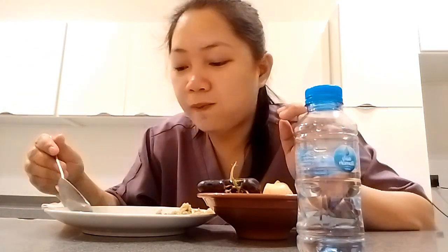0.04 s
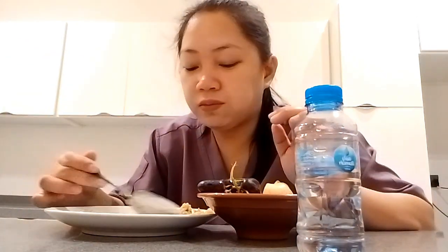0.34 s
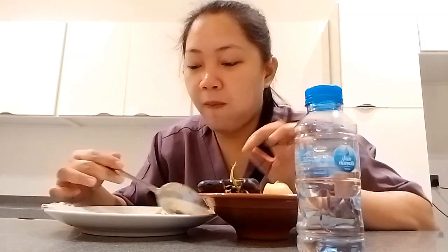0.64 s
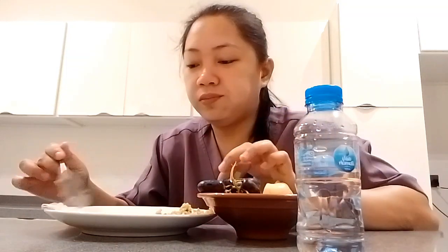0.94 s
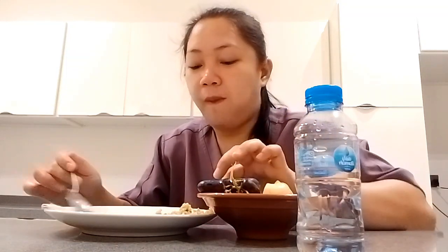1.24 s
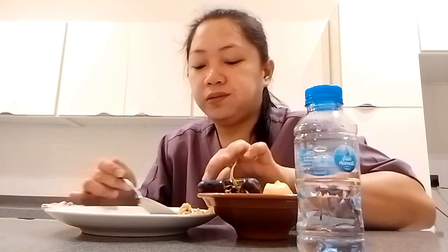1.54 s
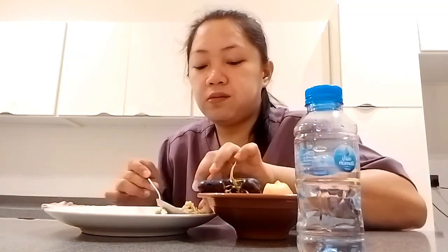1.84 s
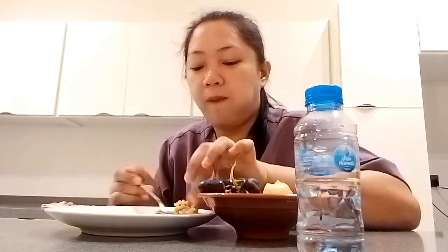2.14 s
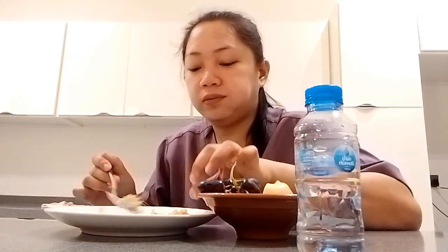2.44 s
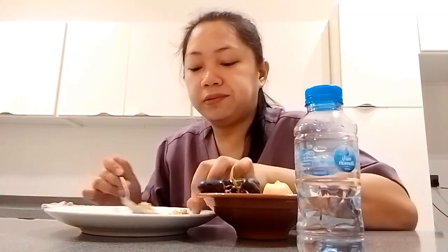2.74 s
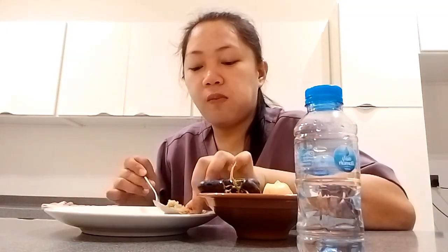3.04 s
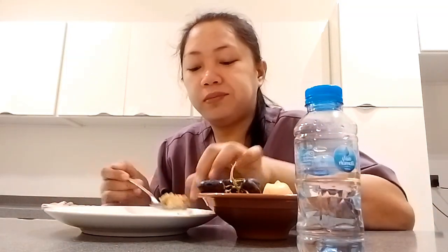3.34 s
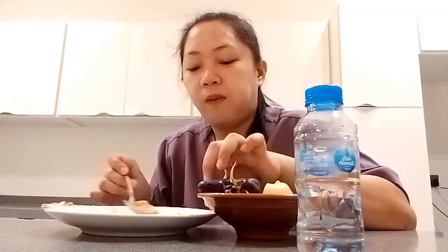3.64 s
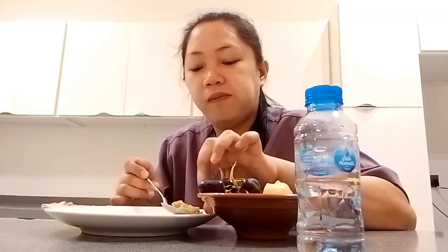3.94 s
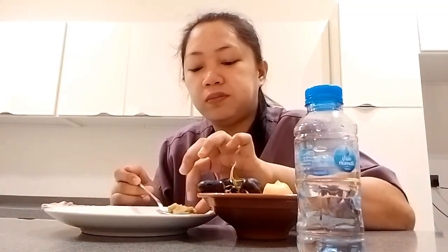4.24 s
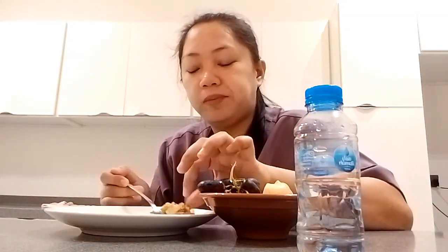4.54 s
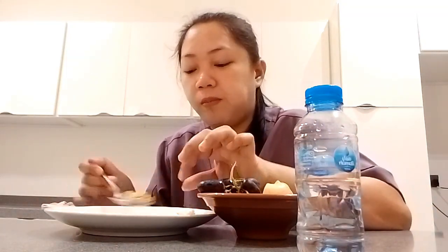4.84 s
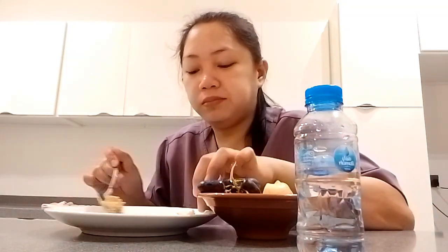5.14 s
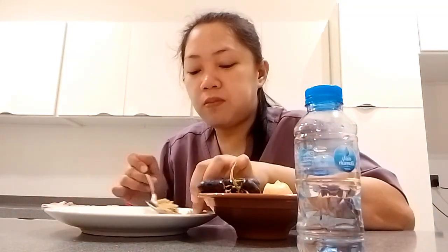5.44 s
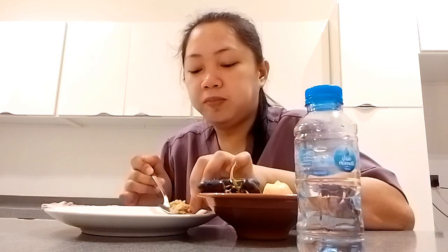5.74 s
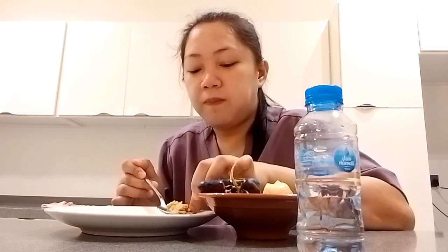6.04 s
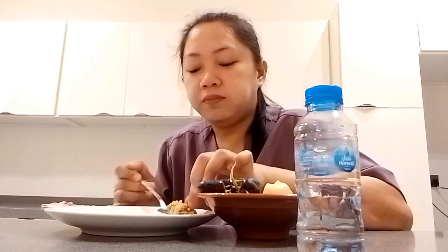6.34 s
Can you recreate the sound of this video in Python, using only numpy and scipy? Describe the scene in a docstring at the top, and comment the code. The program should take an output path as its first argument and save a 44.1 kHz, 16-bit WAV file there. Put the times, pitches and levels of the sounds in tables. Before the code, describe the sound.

A steel spoon clinks, scrapes and squeaks on a ceramic plate, scooping food in a small kitchen with humming appliances.

```python
"""A small kitchen, appliances humming, a phone on the counter as the microphone. Close to it, a steel
spoon clinks on a ceramic plate and drags food across in five scoops. The plate rings differently in
its well, on its slope and at its rim; the spoon's edge sticks and slips on the glaze, rasping and
squeaking, and the room answers. The phone's noise suppressor lets the room's rush up with each
stroke and closes again, the low bands last; once, between scoops, it shuts further on the low rush."""
import sys
import numpy as np
from scipy import signal
from scipy.fft import rfft, irfft, next_fast_len
from scipy.io import wavfile
from scipy.ndimage import uniform_filter1d, map_coordinates

SR = 44100
rng = np.random.default_rng(int(sys.argv[2]) if len(sys.argv) > 2 else 0)


def output_pcm(signal):
    """Save a mono or channel-first signal as 16-bit PCM at the path in sys.argv[1].

    Samples are clipped to [-1, 1] before scaling.
    """
    pcm = np.clip(np.atleast_2d(signal).T, -1, 1) * 32767
    wavfile.write(sys.argv[1], SR, np.round(pcm).astype(np.int16))


N = 290178

# appliance motors: (frequency [Hz], level [dB])
MOTOR_TONES = [(58.6, -69), (76.2, -66), (101.7, -58.5), (117.2, -44.5), (119.9, -63), (127.1, -51.5),
               (145.5, -52.5), (152.5, -56.5), (170.8, -66.5), (178, -60.5), (233.7, -61), (239.9, -60),
               (254.1, -63), (279.6, -68)]
# room tone, a rush of air: (frequency [Hz], relative level [dB])
AIR_SPECTRUM = [(20, -9.5), (45, -11.5), (85, -9), (125, -3), (210, 3.5), (300, 0.9), (385, -2.5),
                (480, -1.5), (620, -8), (850, -22), (1400, -19.5), (2100, -36), (4000, -43.5),
                (6000, -52.5), (8000, -54), (10000, -63), (16000, -66)]
# the plate's modes, by where the spoon touches:
# (frequency [Hz], t60 [s], level in the well [dB], level on the slope [dB], level at the rim [dB])
PLATE_MODES = [(490, .06, -8, -8, -25.5), (556, 0.045, 1.5, -13, -20.5), (831, .05, -4.5, 0.5, -15),
               (976, 0.013, -6.5, -14, -10), (1162, .06, -13.5, -1, -6.5), (1298, .04, -9, -8, -3.5),
               (1424, .03, -19.5, -19.5, 4.5), (1570, .035, -28.5, -31.5, -9),
               (1693, .035, -31.5, -33.5, -14), (2140, .04, -20, -11.5, -12.5),
               (2290, .018, -27, -24, -9.5), (2443, 0.069, -8.5, -22, -8.5), (2864, .02, -14.5, -26, -19.5),
               (3106, .035, -14.5, -14.5, -16.5), (3330, 0.075, -23, 5.5, -2),
               (3400, 0.041, -25, -19.5, 1.5), (3768, 0.081, 1.5, -31.5, -18),
               (3884, .03, -7.5, -27.5, -19.5), (4270, .04, -18.5, -30, -30),
               (4528, .025, -29, -26.5, -12.5), (4638, 0.03, -30, -20, -8), (5190, .03, -23, -24.5, -29),
               (5450, 0.08, -22, -24, -21.5), (5840, .04, -22.5, -32, -31.5), (6040, .05, -25, -31, -18),
               (6880, 0.0078, -23, -29, -29.5), (7526, 0.05, -27, -27, -23.5),
               (7780, .02, -22.5, -26, -33.5), (8120, 0.015, -20.5, -26, -34),
               (9250, .09, -50.5, -49, -38.5), (10000, .02, -36.5, -42, -60), (11140, .06, -36, -42.5, -38),
               (11600, .015, -36, -46.5, -61), (13080, .07, -42, -48, -40.5),
               (13700, .06, -31, -46.5, -39.5), (14600, .022, -26.5, -39, -63.5),
               (15230, .08, -31, -44, -37.5)]
# the spoon lands or catches; place is 0 in the well, 1 on the slope, 2 and up at the rim:
# (time [s], relative level [dB], place [0-2], low-mode boost [dB], relative steel tick [dB])
CONTACTS = [(0.178, -45.5, 0.84, 14.5, -37), (.293, -37.5, 0.33, 7, -18.5), (0.327, -32, 0.4, 14, -21.5),
            (.554, -27, 1.7, 9.5, -17.5), (.628, -31, 1.8, 7, -28), (.6495, -16, 2, 0.5, -46),
            (.652, -19, 2.5, -0.5, -45), (1.152, -33, 1, -4.5, -23), (1.226, -33, 0.99, 0, -25),
            (1.257, -31.5, 1.2, 12, -26), (1.283, -41.5, 0.02, -13, -9.5), (1.316, -40.5, 0.4, -11, -6.5),
            (1.404, -32.5, 0, -19, -21), (1.411, -26.5, 0.036, 0, -29), (1.493, -29, 0.019, -11, -17.5),
            (1.501, -30, 0.052, 6.5, -25), (1.593, -40.5, 0, 24, -20), (1.722, -52, 0.39, -8, -9.5),
            (2.822, -39, 0.093, -6.5, -10.5), (2.87, -40.5, 0.044, -22.5, -7),
            (2.9, -48.5, 0.34, -25, -11.5), (2.98, -51.5, 0.3, -15.5, -2), (2.989, -52.5, 0.78, -10, -3),
            (3.771, -51, 0, -12.5, -8), (3.795, -59, 0.21, -11, -5.5), (3.849, -39.5, 0, -20.5, -10.5),
            (5.121, -35.5, 0.28, 2.5, -1.5), (5.416, -38, 1, 14, -14.5), (5.452, -38.5, 0.62, 4.5, -13.5)]
# the spoon's resonances shift with the grip: (start [s], rasp level [dB],
# then frequency [Hz], level [dB] for each of four bending modes and for the edge)
SPOON_GRIPS = [(0, -6, 3140, 2, 4350, -9, 5610, -8, 8270, -12, 13680, -7),
               (1, -11.5, 3190, -1.5, 4120, -13.5, 5640, -8, 7900, -16, 14370, -11),
               (2.5, -6, 2380, -8, 3050, -1, 3930, -5.5, 5450, -1.5, 14150, -19),
               (2.95, -14.5, 3190, 4, 5520, -3, 7030, -3.5, 8100, -7, 14100, -21),
               (3.5, -7.5, 3260, 1.5, 5480, -5.5, 6100, -7, 8130, -12, 13500, -11),
               (5, -8.5, 3980, -3, 5800, -1, 6500, -11.5, 8230, -12, 14600, -24.5),
               (5.24, -6.5, 3150, 0, 5420, -2, 5760, -11, 8040, -14, 13700, -14),
               (5.4, -9.5, 3200, -7, 4500, -14, 5250, -15.5, 7920, -6, 13700, -11)]
# dry rasp of steel on glaze: (frequency [Hz], relative level [dB])
RASP_SPECTRUM = [(400, -20), (2000, -16), (2900, -7), (4000, -6), (4600, -5), (5300, 2), (5800, 0),
                 (6700, -3), (8300, 2), (9200, -19.5), (10200, -5.5), (11600, -8), (12400, -22.5),
                 (13500, -2.5), (14600, -4), (15500, -6.5), (16000, -17)]
# the kitchen's reverberation: (frequency [Hz], t60 [s])
ROOM_DECAY = [(200, 0.54), (1400, 0.54), (3400, .6), (6000, .56), (9000, 0.61), (15000, .36)]
# narrow tones that swell and fade, mostly the edge catching and squeaking, once near 4 s the air under the
# spoon's bowl at the rim: (time [s], length [s], frequency [Hz], width [Hz], level [dB])
NARROW_TONES = [(.19, .36, 2160, 150, -57), (0.313, 0.012, 3100, 130, -39.5), (0.38, 0.08, 13650, 705, -61),
                (1.22, .08, 2188, 149, -51), (1.283, 0.013, 13800, 300, -56), (1.661, .2, 1088, 131, -55.5),
                (2.06, .05, 3130, 130, -68), (3.169, 0.11, 3285, 200, -68.5), (3.33, .1, 2880, 130, -77),
                (3.887, .014, 8130, 200, -52.5), (3.979, 0.2, 1390, 130, -57),
                (4.035, .06, 3330, 59.6, -65.5), (4.102, 0.25, 4410, 130, -83.5),
                (5.248, 0.11, 3720, 60, -55.5), (5.275, .04, 3140, 130, -54),
                (5.539, 0.04, 3320, 90, -53.5), (5.451, 0.19, 4560, 90, -74.5), (5.2, 0.75, 2410, 130, -76)]
# the spoon is dragged, pressing steadily harder or softer: (time [s], length [s], relative level [dB],
# gain by the end [dB], low-mode boost [dB], start place [0-2], end place [0-2])
DRAGS = [(0.208, .07, -57, -1.5, 1, 1.1, 0.49), (0.292, 0.18, -54.5, -1, 1.5, 0, .35),
         (0.478, 0.07, -57, -1, 4.5, 0.44, .7), (.56, .08, -50.5, 0.5, 7, 1.8, 2),
         (1.228, 0.03, -57, -0.5, 1, 0.7, .9), (1.24, 0.16, -51.5, -1, 5.5, 0.5, 0.26),
         (1.413, 0.098, -51, 4, 1, 0.2, 0.15), (1.642, 0.29, -65.5, -22, 17.5, 0, 0.31),
         (1.707, 0.04, -56, -4, 1, 0.39, 0.28), (1.986, 0.15, -65, -9, -14, 0.41, 0.66),
         (2.823, 0.1, -58.5, 1, -11.5, 0.24, 0.18), (2.968, 0.033, -50, -7, -11, 0, 0.21),
         (3.171, 0.1, -71.5, -5, -10, 0.9, .6), (3.768, 0.08, -62.5, 1.5, -7, 0.71, 0.32),
         (3.851, 0.091, -50, -7.5, -12, 0.47, 0.45), (3.94, 0.066, -67.5, -11, -1, 0.67, .5),
         (4.033, 0.053, -69.5, -0.5, 1, 1.7, 4.3), (5.122, 0.12, -54.5, -4.5, 3.5, 0.061, 0.33),
         (5.252, 0.094, -53.5, -6.5, 1.5, 0.37, 0.19), (5.42, 0.19, -63, -4, 15.5, 1.1, 0.94),
         (5.6, 0.19, -84.5, -11, 32.5, 1.34, 0.71)]
# the air pocket under the spoon's bowl: (time [s], frequency [Hz], relative level [dB])
POCKET_GLIDE = [(.25, 747, -70.5), (0.309, 833, -41.5), (0.399, 950, -52), (0.461, 1050, -53.5),
                (0.509, 1340, -51), (0.569, 1370, -41), (.618, 1420, -40.5), (.631, 1429, -31.5),
                (.643, 1479, -39.5), (.7, 1740, -45.5), (.73, 1790, -64.5)]
# the spoon's own tones off the plate: (frequency [Hz], relative level [dB], t60 [s])
FREE_SPOON_MODES = [(3347, -0.5, 0.091), (4603, -15.5, .5), (5496, -26, .3), (7526, -21, .35)]
# the spoon rebounds and rings freely: (time [s], length [s], level [dB])
REBOUNDS = [(1.153, 0.08, -38.5), (5.469, 0.082, -49.5)]
# the phone's noise suppressor: (frequency [Hz], cut when shut [dB], treble level that opens it [dB])
SUPPRESSOR_BANDS = [(151, -6, -83.5), (222, 6.5, -85.5), (292, 10, -82.5), (418, 20.5, -80),
                    (480, 14.5, -68.5), (610, 16, -65), (863, 1, -60), (1500, 6, -48), (2700, 6.5, -61),
                    (8950, 5.5, -72)]


def amp(db):
    """Decibels to gain."""
    return 10 ** (np.asarray(db) / 20)


def unit(x):
    """Scale to rms 1."""
    return x / np.sqrt(np.mean(x ** 2) + 1e-20)


def along(points, hz, column=1):
    """A column of a frequency table, read on a log axis."""
    table = np.transpose(points)
    return np.interp(np.log(hz + 1), np.log(table[0] + 1), table[column])


def wobble(rate, size):
    """A smooth random curve, rate knots a second."""
    position = np.arange(size) * rate / SR
    grid = np.arange(0, position[-1] + 1, 1 / 8)
    return np.interp(position, grid, map_coordinates(rng.standard_normal(256), [grid], mode="wrap"))


def filtered(x, response):
    """Filter x by a gain given as a function of frequency."""
    size = next_fast_len(len(x) + 8192)
    return irfft(rfft(x, size) * response(np.fft.rfftfreq(size, 1 / SR)), size)[:len(x)]


def add(track, s, sound):
    """Mix a sound in at time s."""
    part = track[max(round(s * SR), 0):][:len(sound)]
    part += sound[:len(part)]


def appliances(drift_rad=0.18):
    """Motor tones hum and beat against each other."""
    t, hum = np.arange(N) / SR, np.zeros(N)
    for hz, db in MOTOR_TONES:
        phase = 2 * np.pi * (hz * t + rng.random()) + drift_rad * wobble(6.9, N)
        hum += amp(db) * np.sqrt(2) * np.sin(phase)
    return hum


def room_rush(level_db=-46):
    """The kitchen's steady rush of air."""
    return amp(level_db) * unit(filtered(rng.standard_normal(N), lambda hz: amp(along(AIR_SPECTRUM, hz))))


def ring(force, hz, t60, build_s=0.0034):
    """One mode driven by a force; it builds up while the bending wave crosses the body."""
    def resonate(x, radius):
        poles = [1, -2 * radius * np.cos(2 * np.pi * hz / SR), radius ** 2]
        return signal.lfilter([1, 0, -1], poles, x)
    decay, build = np.exp(-np.log(1000) / (np.array([t60, build_s]) * SR))
    drive = resonate(force, build) * (1 - build ** 2) / 2
    return resonate(drive, decay) * np.sqrt((1 - decay ** 2) / 2)


def mode_gains(place, low_boost_db):
    """How strongly the plate answers, as (modes, places); the modes above 2 kHz sum to power 1."""
    table = np.array(PLATE_MODES)
    gains = amp([np.interp(place, [0, 1, 2], levels) for levels in table[:, 2:]])
    low = table[:, :1] < 2000
    return gains / np.linalg.norm(gains * ~low, axis=0) * amp(low * low_boost_db)


def steel(force, s, held_t60=0.021, edge_t60=0.0045, grit_db=3, grit_hz=420):
    """The finger-damped spoon as gripped at time s: bending modes, edge, a rasp flecked by the glaze."""
    size = len(force)
    _, rasp_db, *resonances = [grip for grip in SPOON_GRIPS if grip[0] <= s][-1]
    *bending, (edge_hz, edge_db) = zip(resonances[::2], resonances[1::2])
    body = sum(amp(db) * unit(ring(force, hz, held_t60)) for hz, db in bending)
    grit = amp(grit_db * np.clip(wobble(grit_hz, size), -2, 2))
    edge = amp(edge_db) * unit(ring(force * grit, edge_hz, edge_t60))
    spectrum = signal.stft(force, nperseg=128)[2]
    specks = unit(uniform_filter1d(rng.standard_normal(spectrum.shape), size=3, axis=0))
    flecks = signal.istft(spectrum * amp(grit_db * specks), nperseg=128)[1][:size]
    rasp = amp(rasp_db) * unit(filtered(flecks, lambda hz: amp(along(RASP_SPECTRUM, hz))))
    return body + edge + rasp


def kitchen(x, room_db, delay_s=0.014):
    """The close, direct sound, then the diffuse answer of cupboards and walls, new for each spot."""
    hz, t, spectrum = signal.stft(rng.standard_normal(SR * 2 // 3), SR, nperseg=256)
    tail = signal.istft(spectrum * amp(-60 * t / along(ROOM_DECAY, hz)[:, None]), SR, nperseg=256)[1]
    response = amp(room_db) * np.pad(tail, (round(delay_s * SR), 0)) / np.linalg.norm(tail)
    response[0] += 1
    return signal.fftconvolve(x, response)


def clinks(t60_scale=0.89, chatter_t60=0.03, tick_t60=0.035, tick_trim_db=-4, trim_db=-3):
    """Each contact is a blow and a short chatter that ring the plate, with a tick from the spoon."""
    out, t = np.zeros(N), np.arange(SR // 5) / SR
    for s, db, place, low_boost_db, tick_db in CONTACTS:
        force = (t == 0) + 0.15 * rng.standard_normal(len(t)) * amp(-60 * t / chatter_t60)
        gains = mode_gains([place], low_boost_db)[:, 0] * amp(rng.normal(0, 1, len(PLATE_MODES)))
        gains *= rng.choice([-1, 1], len(PLATE_MODES))
        ceramic = sum(gain * unit(ring(force, hz, t60 * t60_scale, build_s=0.0039))
                      for gain, (hz, t60, *_) in zip(gains, PLATE_MODES))
        tick = steel(rng.standard_normal(len(t)), s) * amp(-60 * t / tick_t60)
        clink = ceramic + amp(tick_db + tick_trim_db) * unit(tick)
        onset_rms = np.sqrt(np.mean(clink[t < 0.01] ** 2))
        room_db = np.interp(place, [0, 1, 2], [-10.5, -8.5, -8])  # the rim sends most into the room
        add(out, s, kitchen(amp(db + trim_db) * clink / onset_rms, room_db))
    return out


def rough_tone(hz, width_hz, size, core=0):
    """Narrow noise of rms 1 around a pitch that may glide, with an optional clean core."""
    phase = 2 * np.pi * np.cumsum(np.broadcast_to(hz, size)) / SR
    return unit((core + wobble(width_hz, size)) * np.cos(phase) + wobble(width_hz, size) * np.sin(phase))


def squeaks():
    """Narrow tones lock briefly onto one pitch, swell and fade: the edge's slips, and once the air pocket under
    the bowl at the rim."""
    out = np.zeros(N)
    for s, length_s, hz, width_hz, db in NARROW_TONES:
        size = round(length_s * SR)
        swell = np.sin(np.linspace(0, np.pi, size))
        add(out, s, amp(db) * swell * rough_tone(hz, width_hz, size))
    return out


def plate(force, gains):
    """The plate's modes under a dragging force; neighbours swing in opposite directions."""
    return sum((-1) ** k * ring(force * gains[k], hz, t60) for k, (hz, t60, *_) in enumerate(PLATE_MODES))


def bent(x, depth, rate_hz=22):
    """Let the pitch of a ringing body stray by the share depth."""
    return map_coordinates(x, [np.cumsum(1 + depth * wobble(rate_hz, len(x)))])


def stick_slip(size, slips_hz=2400, spread_db=3.2, rub=0.24, judder_db=1.4, judder_hz=70):
    """The force of steel dragged on glaze: uneven tiny slips over a steady rub, all juddering."""
    pool = SR // 2
    slipping = rng.random(pool) < slips_hz / SR
    slips = slipping * amp(spread_db * np.clip(rng.standard_normal(pool), -2, 2))
    force = unit(slips[:size] - slips.mean()) + rub * rng.standard_normal(pool)[:size]
    return unit(force * amp(judder_db * wobble(judder_hz, size)))


def scrapes(attack_s=0.007, release_s=0.012, wander_db=3, trim_db=-2):
    """The dragged edge rings plate and spoon; as it travels, the modes trade strength and bend in pitch."""
    out = np.zeros(N)
    for s, length_s, start_db, gain_db, low_boost_db, start_place, end_place in DRAGS:
        t = np.arange(0, length_s + 3 * release_s, 1 / SR)
        travel = np.minimum(t / length_s, 1)
        envelope = (1 - np.exp(-t / attack_s)) * np.exp(-2 * np.maximum(t - length_s, 0) / release_s)
        pressure = amp(start_db + gain_db * travel) * envelope
        place = start_place + (end_place - start_place) * travel
        force = stick_slip(len(t))
        wander = amp([wander_db * wobble(25, len(t)) for _ in PLATE_MODES])
        ceramic = bent(plate(force * pressure, mode_gains(place, low_boost_db) * wander), depth=0.003)
        bite = pressure * amp(np.interp(place, [0, 1, 2], [0, -11, -12]))  # strongest in the well
        spoon = bite * bent(steel(force, s), depth=0.0067)
        add(out, s, kitchen(amp(trim_db) * (ceramic + spoon), room_db=-7))
    return out


def air_pocket(width_hz=190, trim_db=-1):
    """The first scoop's hollow note: the air under the spoon rings higher as it is pushed to the rim."""
    s, hz, db = np.transpose(POCKET_GLIDE)
    out, t = np.zeros(N), np.arange(s[0], s[-1], 1 / SR)
    note = rough_tone(np.interp(t, s, hz), width_hz, len(t), core=1)
    add(out, s[0], amp(trim_db + np.interp(t, s, db)) * note)
    return out


def rebounds(attack_s=0.002, stop_s=0.0081):
    """Off the plate the spoon sings on in a few thin tones until it is set down again."""
    out, t = np.zeros(N), np.arange(SR // 3) / SR
    for s, length_s, db in REBOUNDS:
        tones = sum(amp(level - 60 * t / t60) * np.sin(2 * np.pi * (hz * t + rng.random()))
                    for hz, level, t60 in FREE_SPOON_MODES)
        envelope = (1 - np.exp(-t / attack_s)) * np.exp(-np.maximum(t - length_s, 0) / stop_s)
        add(out, s, amp(db) * tones * envelope)
    return out


def suppressor_dip(rush, start_s=4.38, end_s=5.08, edge_s=0.035, dip_db=-8.5, below_hz=350):
    """The low rush drops away for a set time as the phone's suppressor shuts further between scoops."""
    t = np.arange(N) / SR
    low = filtered(rush, lambda hz: hz < below_hz)
    shut = (np.tanh((t - start_s) / edge_s) - np.tanh((t - end_s) / edge_s)) / 2
    return (rush - low) + low * amp(dip_db * shut)


def noise_suppressor(x, fall_db_per_s=50, knee_db=2, smoothing_s=0.018):
    """Treble at the microphone opens the bands; as its held level sinks they shut, the low ones last."""
    hz, t, spectrum = signal.stft(x, SR, nperseg=512)
    treble = (hz > 2500) & (hz < 9000)
    treble_db = 10 * np.log10(np.sum(np.abs(spectrum[treble]) ** 2, axis=0) + 1e-14)
    held_db = np.maximum.accumulate(treble_db + fall_db_per_s * t) - fall_db_per_s * t
    threshold_db = along(SUPPRESSOR_BANDS, hz, column=2)[:, None]
    wanted = (1 + np.tanh((held_db - threshold_db) / (2 * knee_db))) / 2
    lag = np.exp(-t[1] / smoothing_s)
    opened = signal.lfilter([1 - lag], [1, -lag], wanted)
    cut_db = along(SUPPRESSOR_BANDS, hz)[:, None] * (1 - opened)
    return signal.istft(spectrum * amp(-cut_db), SR, nperseg=512)[1][:N]


def scene():
    """From the counter, in mono: spoon and plate up close, the humming kitchen behind."""
    background = appliances() + suppressor_dip(room_rush())
    singing = kitchen(squeaks() + air_pocket() + rebounds(), room_db=-11)[:N]
    return (background + singing + clinks() + scrapes())[None]


def record(dry, top_hz=15830, offset=0.0099):
    """The phone suppresses steady noise and cuts the top; its converter adds a small constant offset."""
    fade = signal.windows.tukey(N, 0.004)
    suppressed = noise_suppressor(dry[0] * fade)
    return offset + filtered(suppressed, lambda hz: hz < top_hz)[None]


dry = scene()
out = record(dry)
output_pcm(out)
```